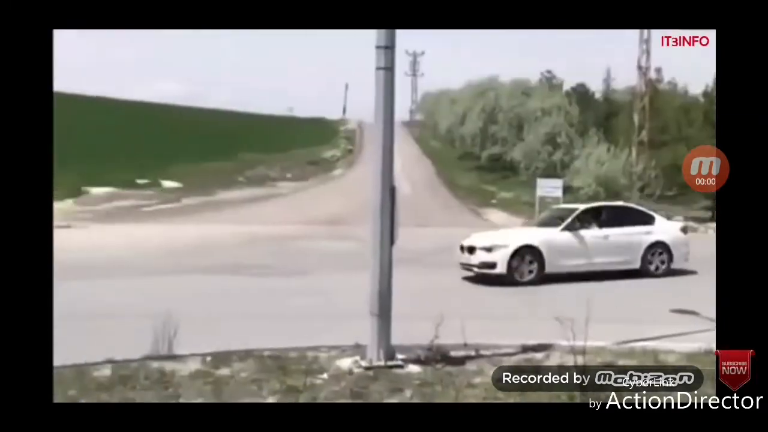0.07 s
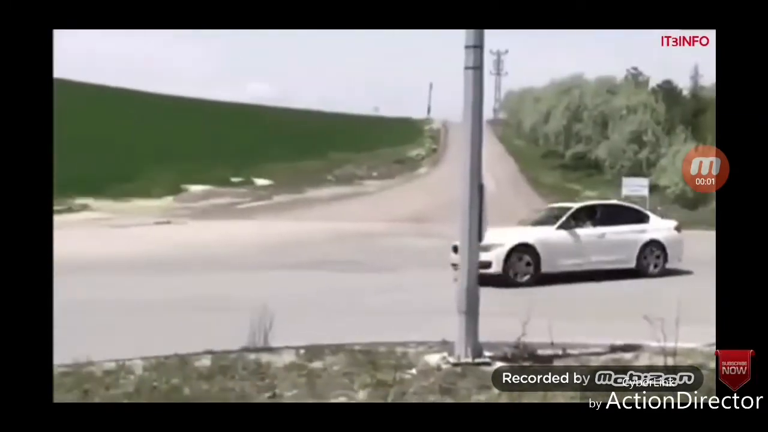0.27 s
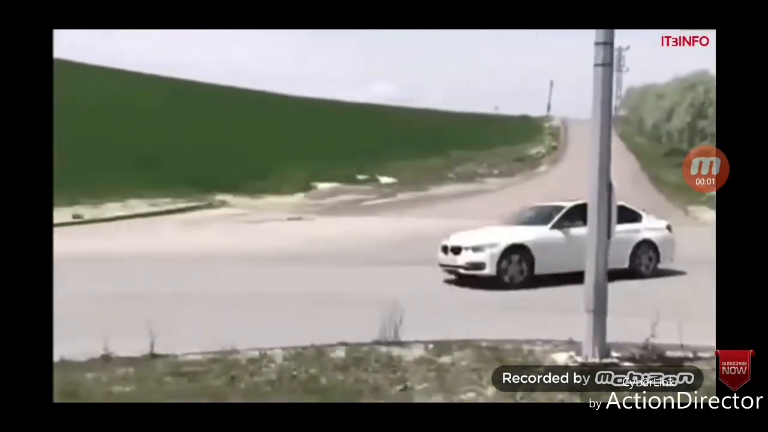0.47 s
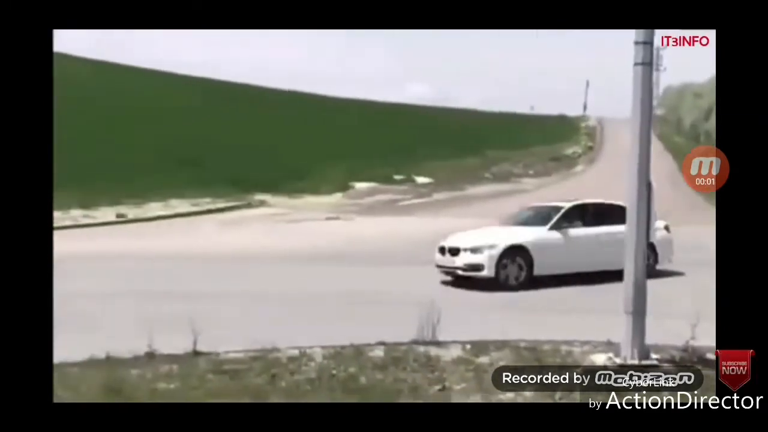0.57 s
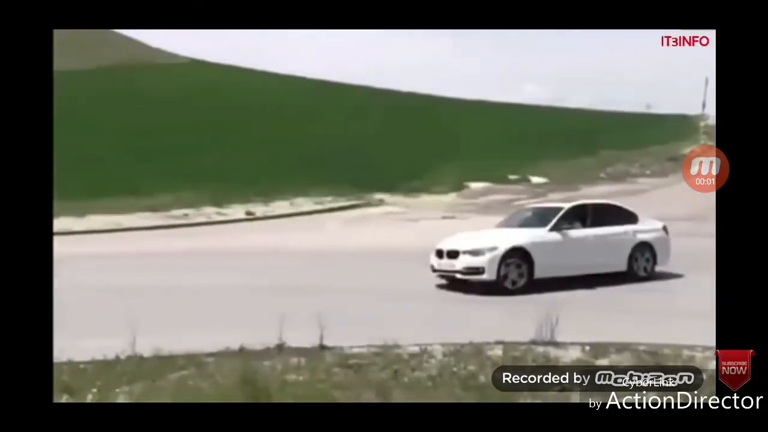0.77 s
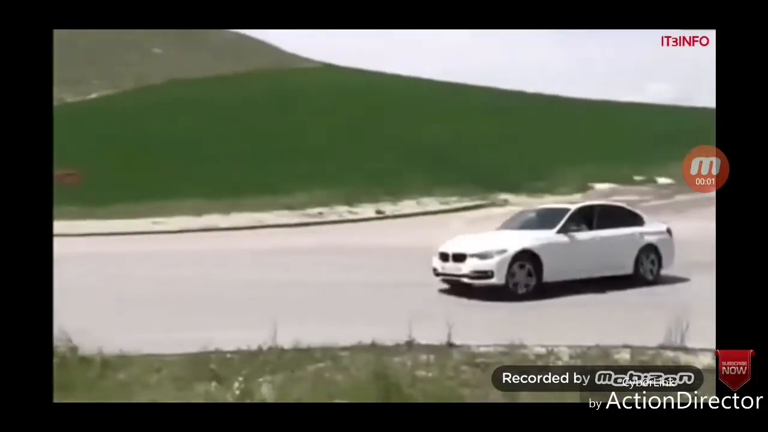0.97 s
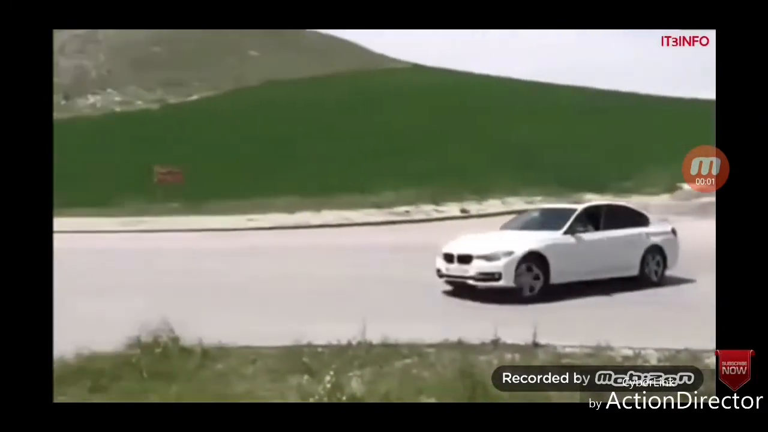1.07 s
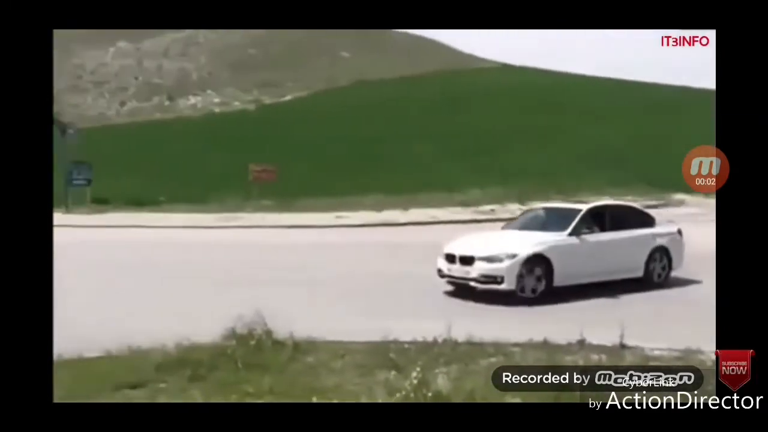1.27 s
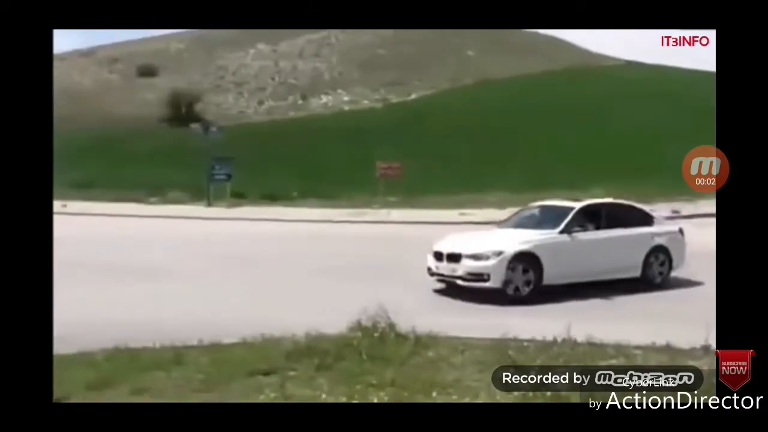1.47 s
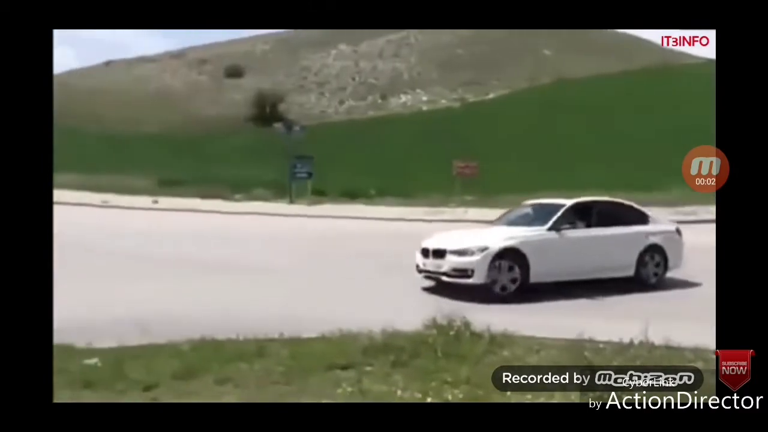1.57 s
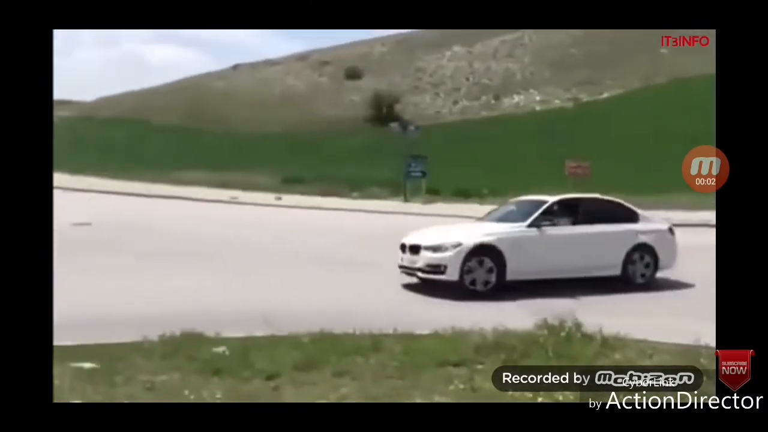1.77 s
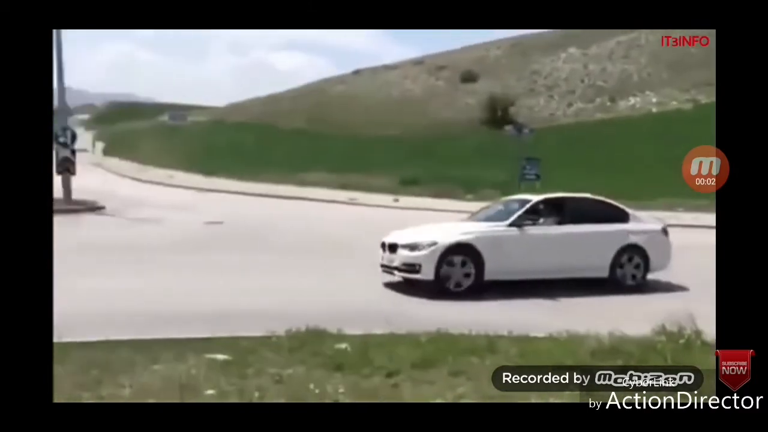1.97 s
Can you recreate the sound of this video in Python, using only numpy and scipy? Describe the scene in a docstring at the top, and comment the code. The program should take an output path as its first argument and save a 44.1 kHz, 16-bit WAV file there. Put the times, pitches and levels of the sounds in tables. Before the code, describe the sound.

Tyres of a sliding car squeal almost from the start and never let go, several rough wavering pitches together, with rubber chirps, sharp squeaks and gritty scrubbing, at an open road junction, picked up outdoors from the roadside.

```python
"""An open junction of dry asphalt, where a car slides past on squealing tyres.
Three tyres stick and slip near 1 to 1.5 kHz, as harmonic tones with a rough, wandering pitch.
Around them many tread blocks chirp briefly or squeak loudly, and filtered noise scrubs over ticking grit.
Under it lie a faint sine whine, a low rumble of shaped noise and a few puffs of wind."""
import sys
import numpy as np
from scipy import signal
from scipy.fft import rfft, irfft
from scipy.io import wavfile
from scipy.ndimage import uniform_filter1d, minimum_filter1d, map_coordinates

SR = 44100
rng = np.random.default_rng(int(sys.argv[2]) if len(sys.argv) > 2 else 0)


def transcribe(u):
    """Save the signal u as a 16-bit wav file named by the first command-line argument.

    u: samples, shape (n,) or (channels, n), limited to [-1, 1]; the rate is SR.
    q: integer samples, one column per channel.
    """
    v = np.clip(np.atleast_2d(u).T, -1, 1)
    q = np.round(v * 32767).astype(np.int16)
    wavfile.write(sys.argv[1], SR, q)


N = 88244  # samples, about 2 s

# spectra of the hissing and thumping parts of wind puffs and grit ticks: freq_hz, relative_db
HISS_SPECTRUM = [(3000, -12), (13000, 6), (15500, 6)]
THUMP_SPECTRUM = [(40, -4), (150, -1.5), (900, -12), (3000, -60)]

JITTER_RATE_HZ, FLUTTER_RATE_HZ = 383, 88  # speed of the pitch roughness and of the level flutter


def undb(db):
    """Decibels to gain."""
    return 10 ** (np.asarray(db) / 20)


def unit(x):
    """Scale to rms 1."""
    return x / np.sqrt(np.mean(x ** 2))


def curve(table):
    """Each column of a table after the first, joined by straight lines in time."""
    rows = np.array(table, float)
    return [np.interp(np.arange(N) / SR, rows[:, 0], column) for column in rows.T[1:]]


def walk(rate_hz):
    """Smooth random wandering of rms 1 that changes about rate_hz times a second."""
    freq_hz = np.arange(N // 2 + 1) * SR / N
    spectrum = rfft(rng.standard_normal(N)) / (1 + (2 * freq_hz / rate_hz) ** 2)
    return unit(irfft(spectrum, N))


def colour(x, points):
    """Filter a sound with a (Hz, dB) response, drawn straight over log frequency; rms 1."""
    point_hz, point_db = np.array(points, float).T
    freq_hz = np.maximum(np.arange(N // 2 + 1) * SR / N, 1)
    response_db = np.interp(np.log(freq_hz), np.log(point_hz), point_db)
    return unit(irfft(rfft(x) * undb(response_db), N))


def swell(at, length):
    """A bell-shaped rise and fall around a moment, about length seconds wide."""
    return np.exp(-2 * ((np.arange(N) / SR - at) / length) ** 2)


def split(x):
    """Low, middle and treble parts of a sound, each at rms 1."""
    below = []
    for split_hz in (1700, 3200):
        sos = signal.butter(N=4, Wn=split_hz, fs=SR, output="sos")
        below.append(signal.sosfiltfilt(sos, x))
    low, low_and_middle = below
    return unit(low), unit(low_and_middle - low), unit(x - low_and_middle)


def air():
    """Low rumble of engine and breeze as shaped noise, with short puffs that thump and hiss."""
    # low, dark bed of noise: freq_hz, relative_db
    rumble_spectrum = [(36, -18), (48, 1), (98, -1.5), (400, -20), (800, -10.5), (15000, -37)]
    # puffs of wind on the microphone: middle_s, length_s, hiss_db, thump_db
    puffs = [(.445, .055, -41.5, -52.5), (0.577, 0.076, -51, -48), (1.37, 0.19, -49.5, -57.5)]
    rumble_db = -49
    out = undb(rumble_db) * colour(rng.standard_normal(N), rumble_spectrum)
    hiss = colour(rng.standard_normal(N), HISS_SPECTRUM)
    thump = colour(rng.standard_normal(N), THUMP_SPECTRUM)
    for at, length, hiss_db, thump_db in puffs:
        puff = undb(hiss_db) * hiss + undb(thump_db) * thump
        out = out + swell(at, length) * puff
    return out


def tyre(table, jitter, third_db, fourth_db):
    """One stick-slip oscillation: the grit shakes its pitch and each harmonic flutters."""
    waver, waver_rate_hz = 0.0091, 40.64  # slower wandering, as a share of the pitch
    flutter_db, grip_share = 3, 0.4  # grip_share: flutter common to all harmonics, beside their own
    pitch_hz, first_db, octave_db = curve(table)
    shaken_hz = pitch_hz * (1 + jitter * walk(JITTER_RATE_HZ) + waver * walk(waver_rate_hz))
    phase = 2 * np.pi * np.cumsum(shaken_hz) / SR
    grip = grip_share * walk(FLUTTER_RATE_HZ)
    harmonic_levels = [first_db, octave_db, octave_db + third_db, octave_db + fourth_db]
    out = 0
    for harmonic, level_db in enumerate(harmonic_levels, start=1):
        flutter = unit(undb(flutter_db * (grip + walk(FLUTTER_RATE_HZ))))
        out = out + undb(level_db) * flutter * np.sqrt(2) * np.sin(harmonic * phase)
    return out


def tyre_squeal():
    """Three tyres stick and slip at their own pitches."""
    # path of each squeal, levels before the common trim: time_s, pitch_hz, fundamental_db, octave_db
    low_tyre = [(0.032, 1076, -77, -53), (.18, 1035, -33, -38), (.4, 1000, -35, -29),
                (0.681, 985, -40, -31.5), (0.759, 972, -26, -35.5), (.92, 992.6, -34.5, -40),
                (1.189, 984.3, -36, -26.5), (1.235, 956, -26.5, -34), (1.369, 944.4, -27, -31),
                (1.441, 928, -34, -40), (1.518, 934.5, -25.5, -29), (1.6, 925, -33, -32),
                (1.69, 954.8, -29, -27.5), (1.799, 952, -37.5, -37), (2, 944, -31.5, -34)]
    main_tyre = [(.03, 1222, -39, -49), (.45, 1189, -34, -44), (.48, 1200, -19, -27), (.53, 1210, -27, -32),
                 (.565, 1205, -25, -29), (.6, 1236, -29, -40), (0.632, 1217, -21, -29),
                 (0.681, 1195, -34, -31), (.8, 1184, -27, -33), (0.981, 1192, -39, -37),
                 (1.219, 1160, -36, -37), (1.31, 1130, -22, -27.5), (1.39, 1104, -34.5, -30.5),
                 (1.461, 1095, -30, -24), (1.52, 1062, -31, -29), (1.58, 1052, -28, -23.5),
                 (1.692, 1002, -26.5, -27.5), (1.77, 1033, -34.5, -22), (1.91, 1093, -56, -27),
                 (1.951, 1135, -48, -35)]
    high_tyre = [(.03, 1529, -28.5, -60), (0.141, 1474, -61, -60), (.18, 1478, -26.5, -46),
                 (.24, 1480, -25.5, -57), (.28, 1475, -39, -50), (0.501, 1503, -37, -32),
                 (.71, 1417, -29, -36), (1.06, 1359, -29, -32.5), (1.24, 1378, -27.5, -28.5),
                 (1.3, 1379, -58, -36), (1.899, 1390, -50, -35.5), (1.96, 1420, -24.5, -27)]
    # timbre of each tyre: pitch_jitter (share), third_db and fourth_db (harmonics re the octave)
    voices = [(.009, -8, -10.5), (.009, -15, -11.5), (.013, -7.5, -39)]
    trim_db = -1.29
    paths = [low_tyre, main_tyre, high_tyre]
    return undb(trim_db) * sum(tyre(path, *voice) for path, voice in zip(paths, voices))


def chirps(count=320, order=7):
    """Tread blocks pass through the contact patch, each squealing briefly; pitch and resonances sag together."""
    # the chirps sag in pitch and recover at the end: time_s, pitch_factor
    sag_path = [(0, 1.033), (.6, 1.018), (1.1, 1), (1.5, 0.97), (1.7, .97), (2, 1.024)]
    # resonances of the tread: freq_hz, response_db
    tread_response = [(700, -37), (830, -12), (930, 4.5), (1000, 0), (1400, -3), (1650, -16), (1850, 1.5),
                      (2230, 3), (2500, 0.5), (2850, -0.5), (3200, -6), (3750, 4.5), (4100, -3), (4800, -9),
                      (6000, -11), (6900, -12.5), (7800, -25.5), (9500, -39), (15000, -71)]
    lowest_hz, highest_hz, jitter = 974.6, 1430.5, 0.0113  # fundamentals before the sag, jitter as a share
    half_height_s = 0.045  # width of a chirp at half its height
    glide_per_s, glide_spread_per_s = -0.22, 1.3  # pitch change as a share per second
    strength_spread_db, overtone_spread_db = 4.5, 7

    out = np.zeros(N)
    (sag,) = curve(sag_path)
    shake = jitter * walk(JITTER_RATE_HZ)
    size = int(2 * half_height_s * SR)
    offset = np.arange(size) - size // 2
    age = offset / SR
    k = np.arange(1, order + 1)[:, None]  # harmonic numbers
    overtones = np.sqrt(k) * undb(overtone_spread_db * rng.random((count, order, 1)))
    for i, (when, pitch, strength, place, glide) in enumerate(rng.random((count, 5))):
        middle = int((i + when) / count * (N - 1))
        base_hz = lowest_hz + (highest_hz - lowest_hz) * pitch
        slope = glide_per_s + (glide - 0.5) * glide_spread_per_s
        roughness = shake[(int(place * N) + np.arange(size)) % N]
        phase = 2 * np.pi * np.cumsum(base_hz * (1 + slope * age + roughness)) / SR
        # overtone phases are scattered so that they do not peak together
        tone = np.sum(overtones[i] * np.sin(k * phase + 2 * np.pi * place * k ** 2), axis=0)
        chirp = undb(strength_spread_db * strength) * np.hanning(size) * tone
        where = middle + offset
        inside = (where >= 0) & (where < N)
        out[where[inside]] += chirp[inside]
    # reading the sound at a varying speed bends pitch and resonances alike
    return map_coordinates(colour(out, tread_response), [np.cumsum(sag)], mode="mirror")


def scrub():
    """Rubber rubs over grit: shaped noise with a fast, grainy level."""
    # colour of the rubbing: freq_hz, relative_db
    scrub_spectrum = [(480, -37), (650, 3.5), (850, 14), (1000, 25.5), (1400, 10.5), (2300, -13.5),
                      (3750, 2.5), (4800, -16), (9500, -39), (15000, -38)]
    grit_db, grit_rate_hz = 2.5, 450
    grain = undb(grit_db * walk(grit_rate_hz))
    return colour(rng.standard_normal(N) * grain, scrub_spectrum)


def contact_patch():
    """Chirping tread and rubber scrubbing over grit, juddering together."""
    # base level of each band, before the mix offsets: time_s, low_db, middle_db, treble_db
    patch = [(.03, -30, -36, -44), (.12, -35.5, -34.5, -41.5), (.32, -29, -28, -34.5), (.47, -28, -27, -29),
             (.62, -27, -24, -28), (.68, -28, -24.5, -30.5), (.85, -27.5, -23.5, -30.5),
             (1.18, -28.5, -26.5, -28.5), (1.45, -31.5, -26, -28.5), (1.72, -29.5, -30.5, -28),
             (2, -33, -30.5, -27)]
    # the rubber bites harder or eases, mostly in the overtones: middle_s, length_s, change_db
    bites = [(0.017, 0.018, 11), (0.202, 0.025, -10.5), (0.94, 0.023, 5)]
    bite_middle_share = 0.54
    chirp_mix_db, scrub_mix_db = (-0.5, -3.5, -2), (-11.5, -7, -4.5)  # low, middle, treble
    judder_db, judder_rate_hz = 1.98, 127

    low_db, middle_db, treble_db = curve(patch)
    bite_db = sum(change_db * swell(at, length) for at, length, change_db in bites)
    levels = [low_db, middle_db + bite_middle_share * bite_db, treble_db + bite_db]
    bands = zip(levels, split(chirps()), split(scrub()), chirp_mix_db, scrub_mix_db)
    out = 0
    for level_db, chirp_band, scrub_band, chirp_db, scrub_db in bands:
        mix = undb(chirp_db) * chirp_band + undb(scrub_db) * scrub_band
        out = out + undb(level_db) * mix
    return out * unit(undb(judder_db * walk(judder_rate_hz)))


def ticks():
    """Sharp cracks of grit with a small thump, gone in a few milliseconds."""
    # single grains: start_s, hiss_db, thump_db
    grains = [(.028, -56, -56), (.411, -41, -41), (.559, -39, -44), (0.6006, -34, -36), (.764, -42, -58)]
    decay_s = 0.0032
    t, out = np.arange(N) / SR, 0
    hiss = colour(rng.standard_normal(N), HISS_SPECTRUM)
    thump = colour(rng.standard_normal(N), THUMP_SPECTRUM)
    for start, hiss_db, thump_db in grains:
        decay = (t >= start) * np.exp(-np.abs(t - start) / decay_s)
        out = out + decay * (undb(hiss_db) * hiss + undb(thump_db) * thump)
    return out


def whine():
    """A thin, slowly rising sine under the squeal, probably the engine gaining speed."""
    # path of the tone: time_s, pitch_hz, level_db
    whine_path = [(.12, 573, -73), (.19, 572.6, -61), (.42, 580, -57.5), (1.2, 626.4, -63),
                  (1.35, 626, -74)]
    pitch_hz, level_db = curve(whine_path)
    return undb(level_db) * np.sqrt(2) * np.sin(2 * np.pi * np.cumsum(pitch_hz) / SR)


def squeaks():
    """One mode of the tread catches, rings out with a rough gliding pitch and lets go."""
    # single loud squeaks of the rubber: middle_s, length_s, start_hz, end_hz, level_db
    squeak_list = [(.16, .05, 2240, 2060, -36), (.303, 0.022, 2100, 2010, -26),
                   (.432, 0.034, 3850, 3780, -28), (.465, 0.041, 2060, 2030, -23),
                   (.568, 0.017, 2380, 2300, -20), (.582, 0.039, 4540, 4450, -28),
                   (.596, .028, 2280, 2160, -17.5), (.641, 0.0265, 2420, 2280, -26),
                   (.951, 0.014, 2210, 2170, -19.5), (.951, 0.013, 3310, 3270, -25),
                   (1.402, 0.033, 3550, 3680, -24.5), (1.93, 0.0995, 3764, 3900, -30.5)]
    jitter, flutter_db = 0.008, 3.5  # jitter as a share of the pitch
    t, out = np.arange(N) / SR, 0
    shake = 1 + jitter * walk(JITTER_RATE_HZ)
    for at, length, start_hz, end_hz, level_db in squeak_list:
        progress = np.clip((t - at) / length + 0.5, -0.5, 2)
        pitch_hz = start_hz + (end_hz - start_hz) * progress
        tone = np.sqrt(2) * np.sin(2 * np.pi * np.cumsum(pitch_hz * shake) / SR)
        out = out + undb(level_db) * swell(at, length) * tone
    return out * unit(undb(flutter_db * walk(FLUTTER_RATE_HZ)))


def with_echoes(slide):
    """Road and car body reflect the slide as delayed, weaker copies."""
    # reflections: delay_s, level_db (re the direct sound)
    echoes = [(0.018, -17.5), (.047, -12)]
    out = slide
    for delay, level_db in echoes:
        out = out + undb(level_db) * np.pad(slide, (int(delay * SR), 0))[:N]
    return out


def dulled(x):
    """The treble dips for a moment and recovers, by subtracting a share of the high-passed sound."""
    # brief dips: middle_s, length_s, share_lost
    dips = [(0.229, 0.028, 0.64), (0.375, 0.032, 0.57), (1.038, 0.038, .8)]
    sos = signal.butter(N=8, Wn=4340, btype="high", fs=SR, output="sos")
    treble = signal.sosfiltfilt(sos, x)
    lost = np.clip(sum(share * swell(at, length) for at, length, share in dips), 0, 1)
    return x - treble * lost


def scene():
    """The tyres break loose at once and squeal on; a few reflections follow."""
    start_s, attack_s = 0.027, 0.0026
    t = np.arange(N) / SR
    onset = np.clip((t - start_s) / attack_s, 0, 1)
    slide = (tyre_squeal() + contact_patch() + squeaks()) * onset
    return (dulled(with_echoes(slide)) + air() + ticks() + whine())[None]


def record(dry):
    """A limiter holds down the loudest peaks and a steep low-pass cuts the top."""
    peak_level, top_hz, window = 0.52, 15550, 176  # full-scale share, Hz, samples (4 ms)
    gain = np.minimum(1, peak_level / np.maximum(np.abs(dry), 1e-9))
    gain = uniform_filter1d(minimum_filter1d(gain, size=window), size=window)
    low_pass = signal.ellip(10, 0.2, 80, top_hz, fs=SR, output="sos")
    return signal.sosfilt(low_pass, dry * gain)


dry = scene()
out = record(dry)
transcribe(out)
```